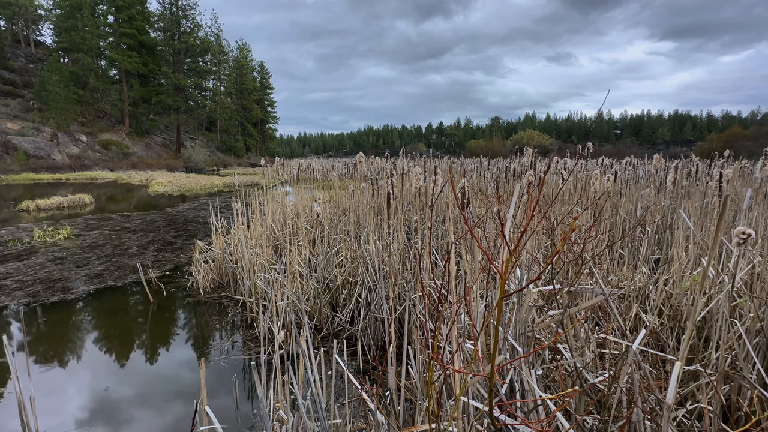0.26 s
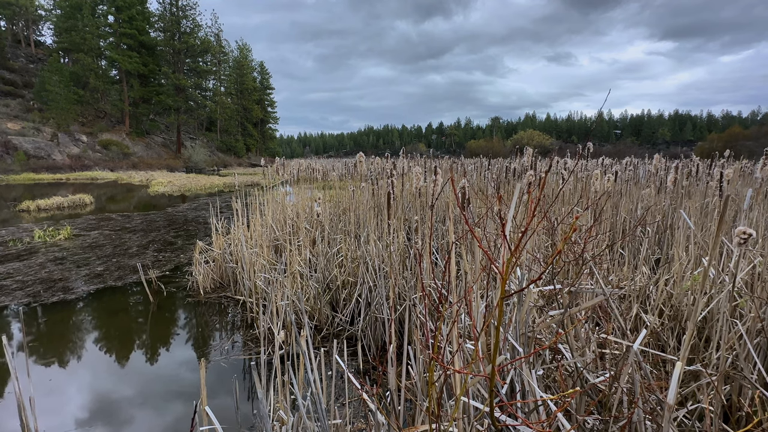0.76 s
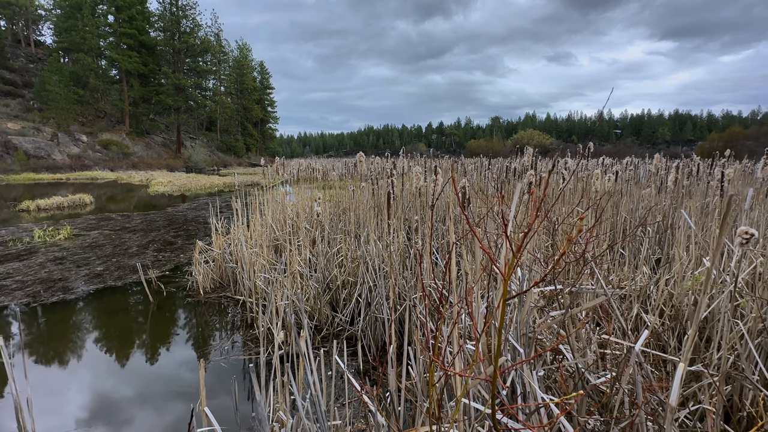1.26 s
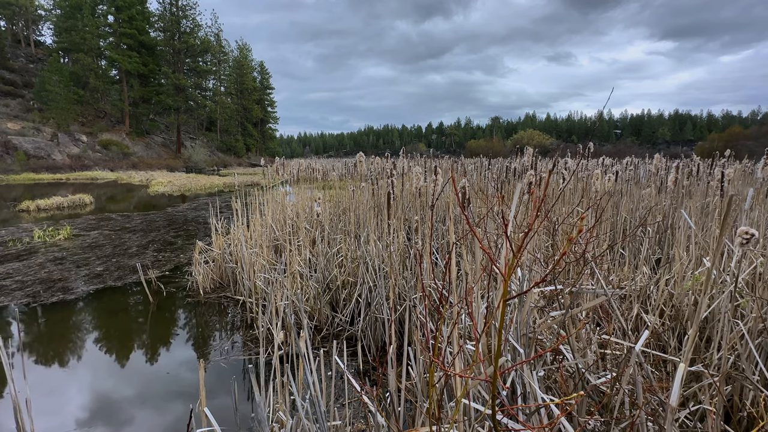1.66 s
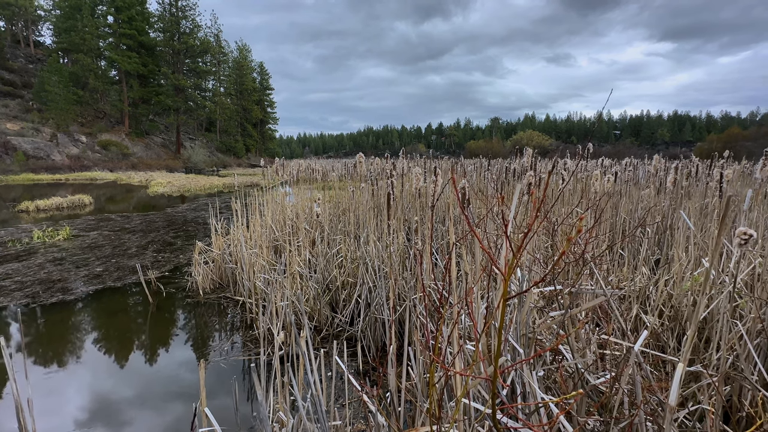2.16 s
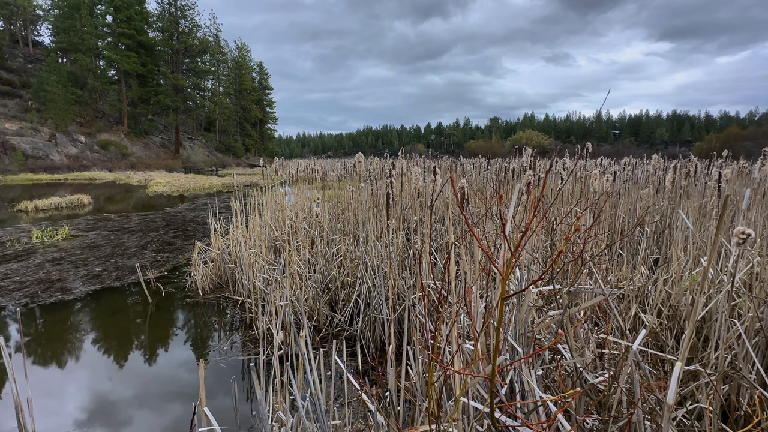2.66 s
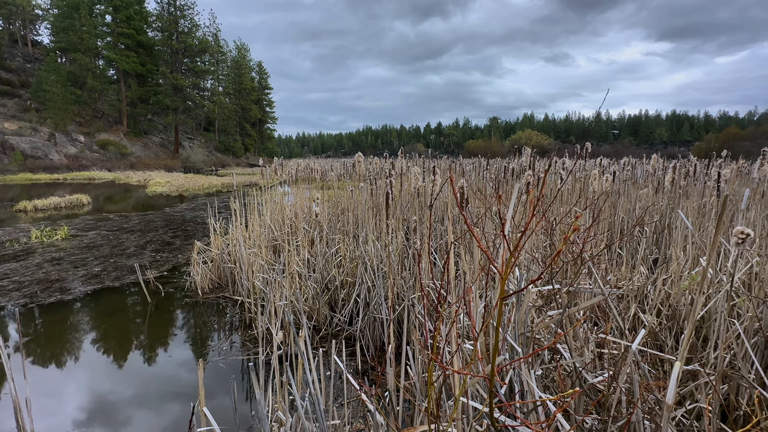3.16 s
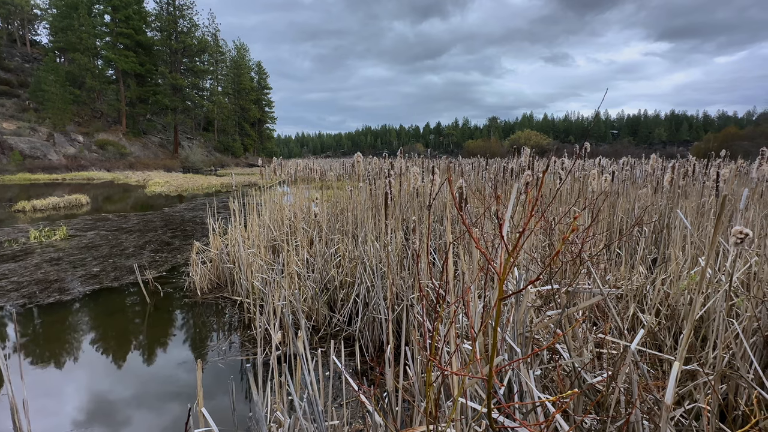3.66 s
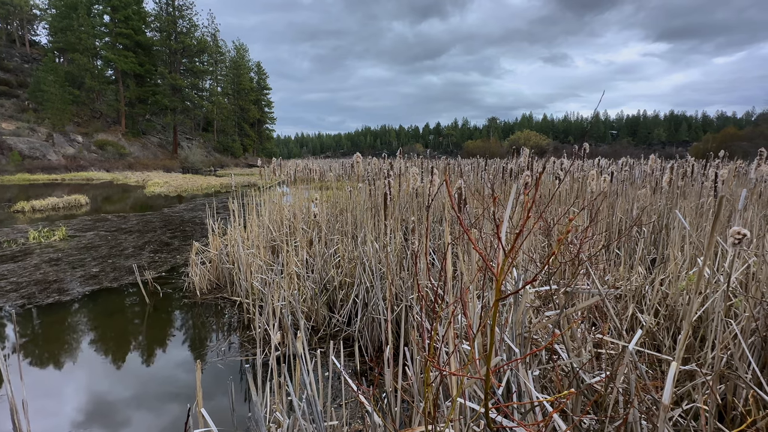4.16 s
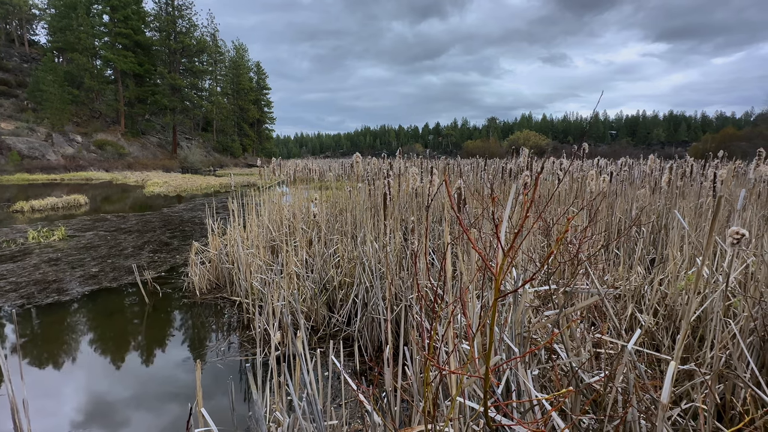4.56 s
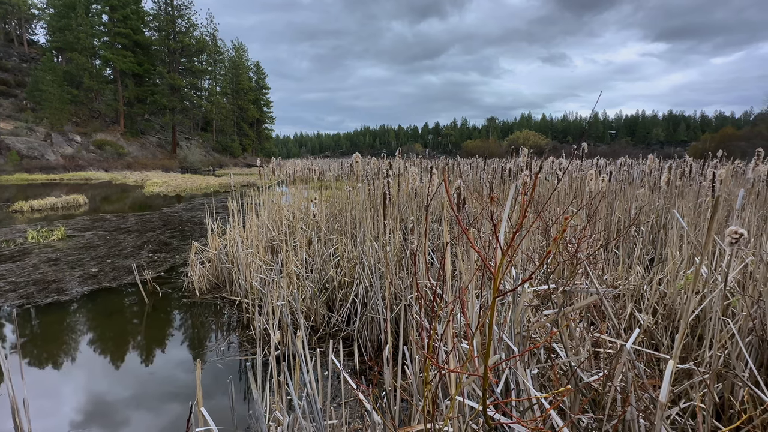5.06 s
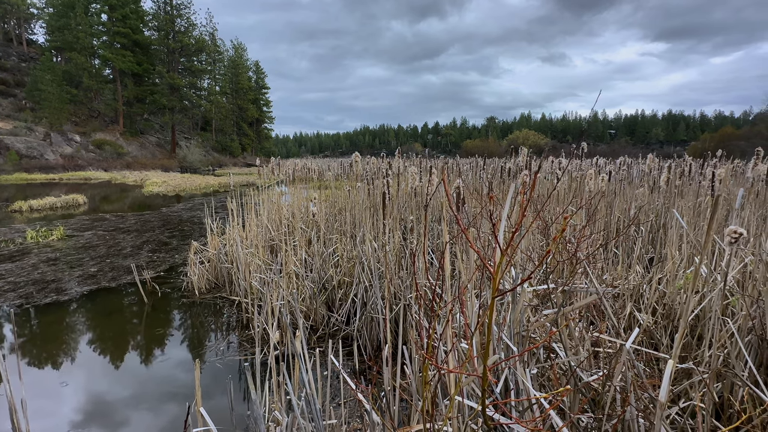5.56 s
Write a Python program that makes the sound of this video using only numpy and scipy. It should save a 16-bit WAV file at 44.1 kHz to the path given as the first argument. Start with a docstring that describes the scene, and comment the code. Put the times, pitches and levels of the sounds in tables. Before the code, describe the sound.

Tree frogs trade pulsed two-part croaks across a reedy pond while wind thumps the microphone and a small bird trills late on.

```python
"""Frog pond in wind

Tree frogs call two-part croaks across a reedy pond: pulsed tones near 1 kHz with a strong octave.
A songbird joins with a trill of gliding whistles and harsh chacks of rattling noise.
Gusts thump on the microphone as low noise and sagging swings, and hiss in dry reeds as grainy noise.
Distant frogs are a murmur of noise; banks, trees and stems return a short, thin echo of the callers.
"""
import sys
import numpy as np
from scipy import signal
from scipy.fft import rfft, irfft
from scipy.io import wavfile
from scipy.ndimage import uniform_filter1d

SR = 44100
rng = np.random.default_rng(int(sys.argv[2]) if len(sys.argv) > 2 else 0)


def log_audio(samples):
    """Write samples as a 16-bit WAV file to the path given in sys.argv[1]."""
    # one column per channel
    frames = np.atleast_2d(samples).T
    # limit to full scale, then quantise
    limited = np.clip(frames, -1, 1)
    pcm = np.round(limited * 32767).astype(np.int16)
    wavfile.write(sys.argv[1], SR, pcm)


N = 256215

FIRST, SECOND = 0, 1  # the two parts of a croak
# croaks: first_pulse_s, last_pulse_s, pulse_count, end_pitch_hz, loudest_pulse_db, frog, part
CROAKS = [(0.073, 0.132, 5, 1002, -31.5, "hollow", SECOND),
          (0.401, 0.5323, 11, 1010, -24.5, "clear", FIRST), (0.637, 0.69, 5, 1073, -24.5, "clear", SECOND),
          (0.902, 0.998, 10, 884, -21.5, "deep", FIRST), (0.924, 0.999, 9, 1021, -28.5, "raspy", FIRST),
          (1.097, 1.12, 3, 1036, -24.5, "raspy", SECOND), (1.089, 1.116, 3, 991, -14.5, "deep", SECOND),
          (1.303, 1.366, 7, 1013, -35, "thin", FIRST), (1.474, 1.537, 6, 1054, -30, "thin", SECOND),
          (1.616, 1.629, 2, 943, -41.5, "far", SECOND), (1.756, 1.848, 9, 935, -36, "thin", SECOND),
          (1.851, 1.942, 7, 947, -36, "hollow", FIRST), (1.979, 2.037, 6, 1056, -34.5, "far", SECOND),
          (2.058, 2.108, 4, 967, -35.5, "hollow", SECOND), (2.174, 2.239, 7, 1005, -46.5, "far", FIRST),
          (2.214, 2.254, 5, 829, -42, "far", FIRST), (2.218, 2.38, 13, 1020, -24.5, "clear", FIRST),
          (2.255, 2.328, 9, 1013, -28, "raspy", FIRST), (2.382, 2.392, 2, 820, -42, "far", SECOND),
          (2.425, 2.446, 3, 1036, -21, "raspy", SECOND), (2.4816, 2.535, 5, 1073, -25, "clear", SECOND),
          (2.567, 2.6748, 11, 903, -19.5, "deep", FIRST), (2.7606, 2.795, 3, 1001, -15, "deep", SECOND),
          (2.819, 2.881, 7, 1042, -35.5, "thin", FIRST), (2.9887, 3.055, 7, 1044, -31.5, "thin", SECOND),
          (3.445, 3.601, 13, 1029, -27, "clear", FIRST), (3.471, 3.547, 9, 1024, -27, "raspy", FIRST),
          (3.642, 3.663, 3, 1046, -21, "raspy", SECOND), (3.697, 3.746, 5, 1080, -25.5, "clear", SECOND),
          (4.009, 4.1165, 11, 917, -19, "deep", FIRST), (4.114, 4.19, 7, 1009, -34, "thin", FIRST),
          (4.1963, 4.225, 3, 999.6, -14.5, "deep", SECOND), (4.329, 4.346, 2, 1124, -39, "far", SECOND),
          (4.362, 4.434, 7, 1032, -34.5, "thin", FIRST), (4.46, 4.531, 6, 895, -39.5, "hollow", FIRST),
          (4.542, 4.61, 7, 1017, -27.5, "thin", SECOND), (4.6553, 4.6667, 2, 963, -31.5, "far", SECOND),
          (4.693, 4.764, 6, 1030, -31, "hollow", SECOND), (4.913, 4.9806, 8, 1016, -26.5, "raspy", FIRST),
          (5.076, 5.0995, 3, 1041, -21.5, "raspy", SECOND), (5.199, 5.3578, 13, 998, -24.5, "clear", FIRST),
          (5.456, 5.52, 6, 1056, -24.5, "clear", SECOND), (5.612, 5.7022, 9, 881.6, -20.5, "deep", FIRST),
          (5.8025, 5.811, 2, 924, -12, "deep", SECOND)]
# each frog's voice, three rows; the first: fundamental_db, third_partial_db (both against the octave),
# pulse_narrowness (exponent), unevenness_db; then one row for each part: pitch_rise_hz_per_s,
# loudest_place (0-1 of the call, limited to it), first_pulse_db, last_pulse_db, start_dip_db, end_dip_db
FROG_VOICES = {"deep": ((-8, -20, 2, -0.38), (803.5, 0.68, -12.5, -7, -26.5, -25),
               (2604, -0.5, -1, -7.5, -4.5, -8.5)), "clear": ((-11, -37, 3, 1.88),
               (748.5, .8, -18.5, -8.5, -43, -39), (1200, -2, -1.5, -3.5, -46, -9)),
               "raspy": ((-17, -18.5, 4.5, 0.4), (1098, -1.5, -10, 2.5, -43, -35),
               (498, 0.7, 1, -11.5, -18, 2)), "thin": ((-19, -16, 2.4, 2.5), (1200, .75, -6, -3, -14, -8),
               (300, .3, -1, -5, -15, -6)), "hollow": ((-4, -26.5, 1.5, 4),
               (1010, 0.4, -6.5, 3.5, -30, -19), (990, -0.2, -4.5, -4.5, -37, -14)),
               "far": ((-10.5, -21, 4, 4), (688, -1, -2, 5, -27, -18), (998, -1.5, 2, -2.5, -21, -12))}
# dying away after the last pulse: first_part_s, second_part_s
RELEASE_S = (0.0039, 0.0042)
PITCH_BEND = 1.574  # above 1: the pitch climbs early in a call, then levels off

# bird whistles: start_s, length_s, start_pitch_hz, third_way_pitch_hz, end_pitch_hz, level_db (before the
# beak), closing_fall_s
NOTES = [(3.764, 0.062, 5100, 4540, 4700, -46, .002), (3.873, 0.024, 3700, 3900, 4030, -42.5, 0.0046),
         (3.952, .016, 4150, 4600, 4100, -43, .002), (4.025, .027, 3900, 4350, 4550, -42, .001),
         (4.102, 0.029, 3500, 4100, 4300, -30.5, 0.0052), (4.187, 0.025, 3490, 4000, 4400, -31.5, 0.013),
         (4.271, .028, 3600, 4370, 4200, -28.5, .01), (4.354, .034, 3860, 4300, 4250, -30.5, .011),
         (4.454, .035, 3950, 4150, 3950, -28, .015), (4.555, .035, 3850, 4150, 4150, -25.5, .012),
         (4.658, 0.035, 3510, 3900, 4230, -26, 0.016), (4.722, .018, 4230, 3600, 4400, -38, 0.012),
         (4.793, 0.031, 2736, 3800, 4140, -29.5, 0.021), (4.918, 0.039, 3650, 4100, 4150, -36.5, 0.021),
         (5.035, .028, 3800, 4070, 4500, -31, 0.019), (5.094, .032, 4350, 4600, 4700, -34, 0.0012),
         (5.131, .036, 3550, 4250, 4600, -31, .011), (5.212, .014, 4200, 4400, 4550, -34, .001),
         (5.233, .012, 4450, 4400, 4350, -35, .001), (5.25, .04, 3820, 4450, 4500, -30.5, .002),
         (5.279, 0.027, 4900, 4100, 4300, -33.5, 0.016), (5.323, 0.0069, 3770, 4900, 3200, -36, 0.017),
         (5.344, 0.006, 2480, 3600, 4600, -36, 0.026), (5.36, 0.007, 2830, 4000, 3200, -32.5, 0.016),
         (5.367, 0.021, 4030, 4450, 4500, -29.5, .002), (5.471, 0.018, 4170, 4420, 4500, -29.5, 0.0048),
         (5.488, 0.013, 4260, 4450, 4000, -36, 0.0075), (5.667, 0.0085, 3400, 4700, 6000, -34, 0.0014),
         (5.674, 0.062, 4900, 4430, 4550, -27, 0.00089)]
# harsh chacks: start_s, rise_s, fade_s, level_db (rms before the swell)
CHACKS = [(0.186, 0.023, 0.0068, -32), (4.81, 0.015, 0.0064, -30), (4.974, 0.016, 0.0099, -29.5)]
# resonances of the bird's throat in a chack: centre_hz, width_hz, level_db
THROAT_MODES = [(1500, 88, 0.5), (2260, 560, -9), (2920, 260, 2), (3500, 150, 6.5), (4080, 170, 7.5),
                (4560, 100, -4)]
BEAK_HZ, BEAK_OCTAVES, FLUTTER_DB = 4000, .47, 2
FALL_OCTAVES_PER_S = 80
# the longer the fall, the stronger its octave
HELD_OCTAVE_DB, FALL_OCTAVE_DB, OCTAVE_GROWTH_DB_PER_S = -6.5, -25, 746

# wind on the microphone: time_s, level_db
GUST_LEVELS = [(0, -37), (.3, -51.5), (.5, -44), (.8, -52.5), (1, -38.5), (1.3, -53.5), (1.72, -38.5),
               (2.15, -56), (2.4, -40), (2.6, -54), (2.95, -48.5), (3.3, -66), (3.78, -47.5), (4, -70),
               (4.5, -65), (5.15, -42), (5.45, -47), (5.81, -48)]
# bands of the wind rumble: centre_hz, width_hz, level_db
GUST_MODES = [(53, 38, 2), (142, 190, -14)]
# eddies thump the membrane: start_s, level_db, pitch_hz, air_slap_db (against the swing)
THUMPS = [(0.057, -23.5, 83, -47), (0.172, -28.5, 65, -39), (0.473, -34.5, 63, -30), (1.171, -36, 64, -21),
          (1.742, -21, 72, -39), (1.819, -23.5, 71, -28), (2.244, -33, 91, -14), (2.304, -28.5, 77.5, -25),
          (2.383, -26, 94, -18), (2.478, -19.5, 102, -20), (2.704, -33.5, 121, -17.5),
          (2.924, -40.5, 65, -14), (3.013, -41.5, 84, -10), (3.156, -37.5, 64.5, -29),
          (3.364, -42.5, 96, -2), (3.64, -39, 74, -15), (4.9, -37.5, 66.5, -27), (5.324, -28.5, 82, -19.5)]

# wind in the reeds: time_s, level_db
REED_LEVELS = [(0, -68.5), (.2, -74), (.36, -63), (.83, -70.5), (.97, -61.5), (1.42, -66), (1.52, -52.5),
               (1.75, -51.5), (2.05, -49.5), (2.25, -62), (3.4, -61), (4.05, -69), (4.43, -64.5),
               (4.68, -57.5), (5, -69), (5.53, -59), (5.81, -63)]
# colour of the reed hiss: frequency_hz, relative_db_per_hz
REED_COLOUR = [(1470, -18.5), (2500, 1), (4050, -14), (5170, -5.5), (7250, -1), (8250, -8.5), (9920, -5),
               (15600, -14.5)]
# dry reeds tick: start_s, level_db (before the band filter), fade_s
TICKS = [(0.547, -45.5, 0.013), (0.5757, -42.5, 0.011), (0.931, -46.5, 0.034)]

# colour of distant chorus and air: frequency_hz, relative_db_per_hz
FAR_COLOUR = [(71, -50.5), (120, 0), (627, -4), (680, -7), (738, -3.5), (1040, -2), (1170, -5), (4190, -26),
              (4930, -62), (6000, -48), (7800, -73.5), (13200, -120)]
FAR_DB, FAR_SWELL_DB = -54, 1.2

ECHO_T60_S, ECHO_DB, ECHO_GAP_S = 0.17, -14.5, 0.0034
STEMS_FROG, STEMS_BIRD = .3, 1.3  # early returns from stems, against the late ones
NOTCH_HZ, NOTCH_WIDTH_HZ, TOP_HZ = 8270, 2760, 15750  # microphone


def undb(db):
    """Decibels to amplitude."""
    return 10 ** (np.asarray(db) / 20)


def unit(x):
    """Scale to rms 1."""
    return x / np.sqrt(np.mean(x ** 2))


def curve(rows):
    """A (time_s, value) table at every sample."""
    return np.interp(np.arange(N) / SR, *np.transpose(rows))


def band(x, hz, width):
    """One resonance, gain 1 at the centre."""
    return signal.lfilter(*signal.iirpeak(hz, hz / width, fs=SR), x)


def coloured(spectrum):
    """Noise of rms 1 with the given (frequency_hz, db) colour."""
    hz, db = np.transpose(spectrum)
    f = np.fft.rfftfreq(N, 1 / SR) + 1
    gain = undb(np.interp(np.log(f), np.log(hz), db, -90, -90))
    return unit(irfft(rfft(rng.standard_normal(N)) * gain, N))


def walk(rate):
    """Random levels held 1 / rate s and slewed; spread near 1."""
    k = int(SR / rate)
    held = np.repeat(rng.standard_normal(N // k + 1), k)
    return 0.91 * uniform_filter1d(held, k)[:N]


def add(out, s, sound):
    """Mix a sound in from s seconds on."""
    i = int(s * SR)
    out[i:i + len(sound)] += sound[:max(N - i, 0)]


def frogs(fourth_db=-9, fifth_db=-20, ring=0.79, click=0.21):
    """The larynx hums near 1 kHz, the vocal sac favours the octave, and a valve chops the tone into pulses."""
    out, rough, uneven = np.zeros(N), walk(900), walk(90)
    hiss = unit(band(band(rng.standard_normal(N), 3000, 1500), 3000, 2000)) / 3.5
    for first, last, count, end_hz, db, frog, part in CROAKS:
        (low_db, third_db, narrow, uneven_db), *parts = FROG_VOICES[frog]
        rise, place, first_db, last_db, dip_db, end_dip_db = parts[part]
        length = last - first
        period = length / max(count - 1, 1)
        start = first - 0.41 * period
        t = start + np.arange(int((last - start + .04) * SR)) / SR
        i = np.minimum((t * SR).astype(int), N - 1)

        # the valve opens quickly and closes more slowly
        valve = np.sin(np.pi * ((t - start) / period % 1) ** 0.69) ** narrow
        # the dip between pulses changes over the call; the leak sets in within milliseconds
        dip = undb(np.interp(t, [first, last], [dip_db, end_dip_db]))
        leak = np.minimum(dip, 1) * np.minimum((t - start) / 0.006, 1)
        puff = leak + (1 - leak) * valve
        # after the last pulse the octave from the sac dies a little sooner than the other partials
        over, release = np.maximum(t - last, 0), RELEASE_S[part]
        sac = np.where(over > 0, np.exp(-(over / (ring * release)) ** 1.5), puff)
        rest = np.where(over > 0, np.exp(-(over / release) ** 1.5), puff)

        loudest = first + np.clip(place, .01, .99) * length
        effort = db + np.interp(t, [first, loudest, last], [first_db, 0, last_db])
        effort += uneven_db * uneven[i]
        hz = end_hz - rise * length * np.clip((last - t) / length, 0, 1) ** PITCH_BEND
        # bright and uneven voices are rougher
        rasp = .1 + 1.7 * undb(third_db) + .09 * uneven_db
        phase = 2 * np.pi * np.cumsum(hz) / SR + rasp * rough[i] / 2

        low = undb(low_db) * np.sin(phase)
        upper = np.sin(3 * phase) + undb(fourth_db) * np.sin(4 * phase) + undb(fifth_db) * np.sin(5 * phase)
        # the valve cuts a little deeper into the upper partials and hiss
        upper = undb(third_db) * (upper + hiss[i]) * puff ** click * 0.84
        add(out, start, undb(effort) * (sac * np.sin(2 * phase) + rest * (low + upper)))
    return signal.sosfilt(signal.butter(6, 4700, fs=SR, output="sos"), out)


def bird():
    """The song: whistles whose level flutters, and chacks."""
    out = whistles() * undb(FLUTTER_DB * walk(250))
    add_chacks(out)
    return out


def whistles(twelfth_db=-30):
    """Gliding tones snap down at the end; the beak shapes the fundamental and its patchy octave."""
    out, wobble = np.zeros(N), .009 * walk(260)
    broken_db = 5 * walk(350)  # the octave comes in patches
    for s, length, hz0, hz1, hz2, db, fall in NOTES:
        fall_hz = hz2 * 2 ** (-FALL_OCTAVES_PER_S * fall)
        fall_db = FALL_OCTAVE_DB + OCTAVE_GROWTH_DB_PER_S * fall
        t = np.arange(int((length + fall) * SR)) / SR
        here = slice(int(s * SR), int(s * SR) + len(t))
        knots = [0, length / 3, length, length + fall]
        hz = np.exp(np.interp(t, knots, np.log([hz0, hz1, hz2, fall_hz])))
        hz = uniform_filter1d(hz, size=99) * (1 + wobble[here])
        phase = 2 * np.pi * np.cumsum(hz) / SR
        edges = np.minimum(1, np.minimum(t, t[::-1]) / .002)
        breath = undb(np.interp(t, knots, [-7, -2.5, 0.0, -11.5])) * edges
        octave_db = np.interp(t, knots, [HELD_OCTAVE_DB, HELD_OCTAVE_DB, fall_db, fall_db])
        octave = undb(octave_db + broken_db[here])
        voice = beak(hz) * np.sin(phase)
        voice += octave * beak(2 * hz) * np.sin(2 * phase)
        voice += undb(twelfth_db) * np.sin(3 * phase)
        add(out, s, undb(db) * breath * voice)
    return out


def beak(hz, floor_db=-22):
    """Gain of throat and beak: a broad resonance above a floor."""
    return np.exp(-.5 * (np.log2(hz / BEAK_HZ) / BEAK_OCTAVES) ** 2) + undb(floor_db)


def add_chacks(out):
    """Harsh calls: a rattle of stepped noise through the resonances of the throat."""
    t = np.arange(SR // 10) / SR
    for s, rise, fade, db in CHACKS:
        steps_db = rng.standard_normal(len(t) // 30).repeat(30)
        rattle = rng.standard_normal(len(t)) * undb(steps_db)
        swell = np.where(t < rise, (0.32 + 0.74 * t / rise) ** 2, np.exp((rise - t) / fade))
        throat = sum(undb(g_db) * band(rattle, hz, width) for hz, width, g_db in THROAT_MODES)
        throat += 0.013 * swell * rattle  # some noise bypasses the resonances
        add(out, s, undb(db) * swell * unit(throat))


def wind(droop=12, thump_s=0.013):
    """Eddies of very uneven size buffet the microphone port as low noise; some thump the membrane."""
    eddies = rng.standard_normal(N) * undb(4.6 * walk(30))
    rumble = sum(undb(g_db) * unit(band(band(eddies, hz, w), hz, 2 * w)) for hz, w, g_db in GUST_MODES)
    out = undb(curve(GUST_LEVELS)) * rumble
    t = np.arange(SR // 8) / SR
    for s, db, hz, slap_db in THUMPS:
        # a quick push, then fast-fading swings that sag in pitch
        swing = np.sin(2 * np.pi * hz * (1 - np.exp(-droop * t)) / droop)
        slap = unit(band(band(rng.standard_normal(len(t)), 162, 100), 200, 220))
        push = t / 0.0029 * np.exp(1 - t / 0.0066) ** .5 * np.exp(-t / thump_s)
        add(out, s, undb(db) * push * (swing + undb(slap_db) * slap))
    return out


def reeds():
    """Dry stems hiss with the wind, in fine grains, and tick now and then."""
    grain = undb(2.0 * walk(17) + 0.72 * walk(130))
    out = coloured(REED_COLOUR) * grain * undb(curve(REED_LEVELS))
    t = np.arange(SR // 20) / SR
    for s, db, fade in TICKS:
        tick = band(rng.standard_normal(len(t)), 9000, 8400)
        add(out, s, undb(db) * np.exp(-(t / fade) ** 2) * tick)
    return out


def distant_chorus():
    """Far frogs blur into a murmur at the pitch of their vocal sacs, over the coloured noise of the air."""
    murmur = undb(-8.0) * unit(band(band(rng.standard_normal(N), 2080, 400), 1800, 600))
    return (coloured(FAR_COLOUR) + murmur) * undb(FAR_DB + FAR_SWELL_DB * walk(2.883))


def echo(x, early):
    """Scattered returns from stems (early share), banks and trees; thin stems return little bass."""
    t = np.arange(SR // 2) / SR
    noise = band(rng.standard_normal(len(t)), 2960, 4200) * np.minimum(t / ECHO_GAP_S, 1) ** 2
    late = np.exp(-np.log(1000) * t / ECHO_T60_S)
    tail = noise * (late + early * np.exp(-t / 0.0038))
    tail /= np.sqrt(np.sum((noise * late) ** 2))  # the late part alone has energy 1
    return undb(ECHO_DB) * signal.fftconvolve(x, tail)[:N]


def scene():
    """Frogs and bird with their echoes, then wind, reeds and the distant chorus."""
    croaks, song = frogs(), bird()
    # the bird's song feeds the echo 4 dB stronger
    echoes = echo(croaks, STEMS_FROG) + echo(undb(4.0) * song, STEMS_BIRD)
    return (croaks + song + echoes + wind() + reeds() + distant_chorus())[None]


def record(dry):
    """The microphone port has a deep notch in the treble and drops the deepest bass; the top is cut."""
    bass_cut = signal.sosfilt(signal.butter(2, 32, "high", fs=SR, output="sos"), dry)
    notch = signal.iirnotch(NOTCH_HZ, NOTCH_HZ / NOTCH_WIDTH_HZ, fs=SR)
    notched = signal.lfilter(*notch, bass_cut)
    return signal.sosfilt(signal.ellip(14, .3, 90, TOP_HZ, fs=SR, output="sos"), notched)


dry = scene()
out = record(dry)
log_audio(out)
```